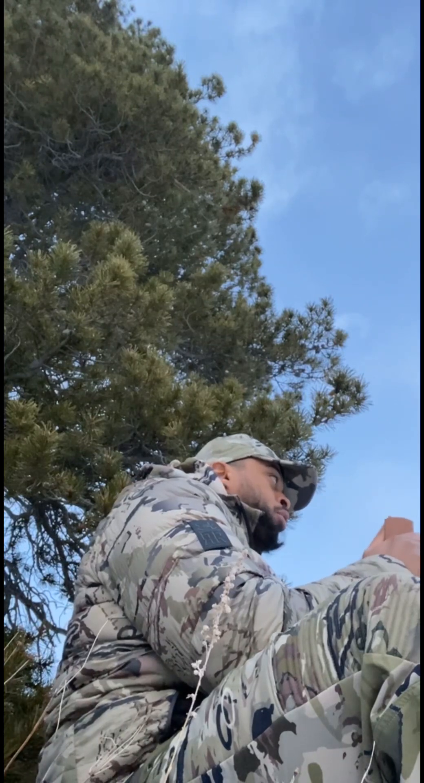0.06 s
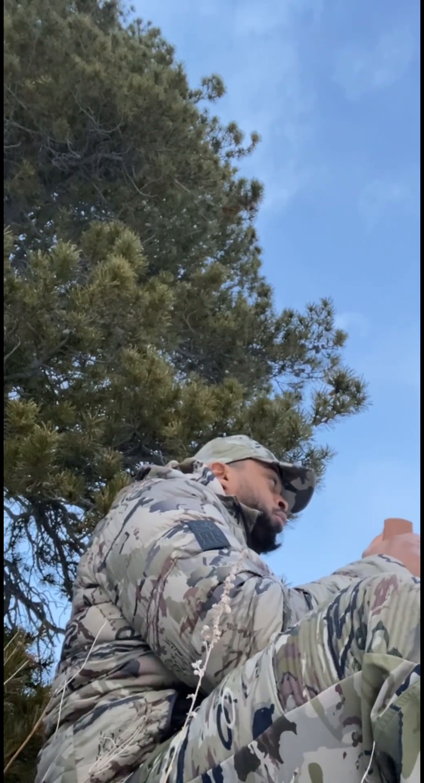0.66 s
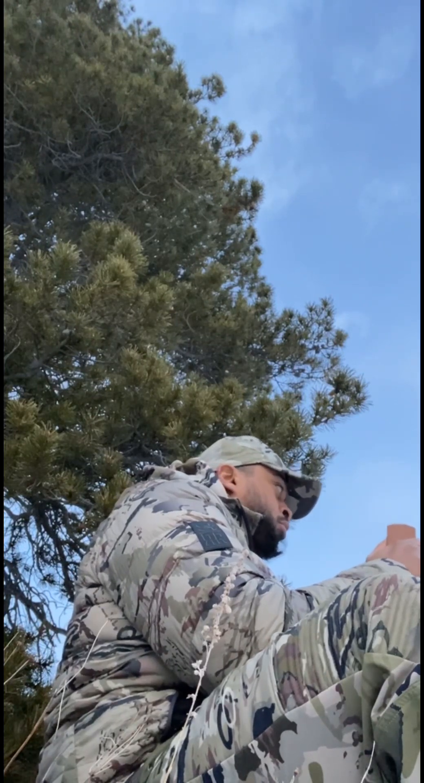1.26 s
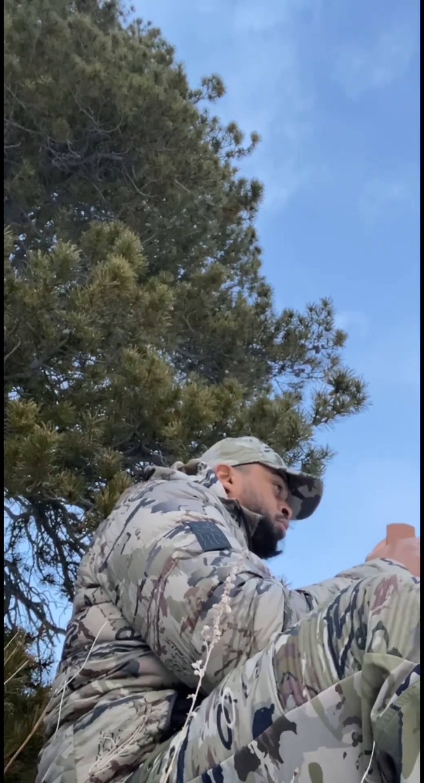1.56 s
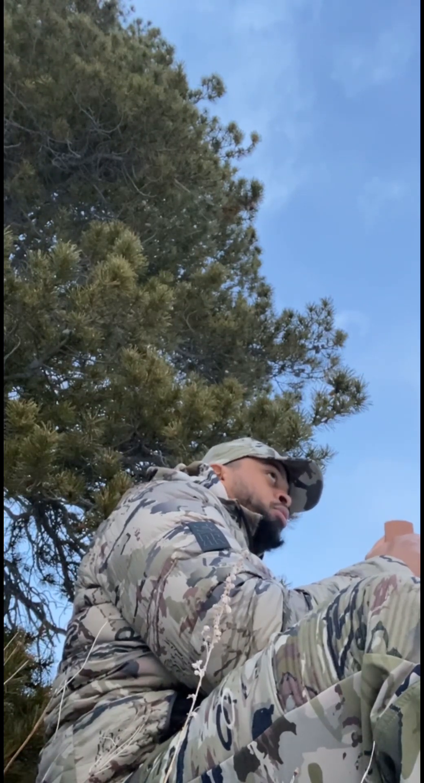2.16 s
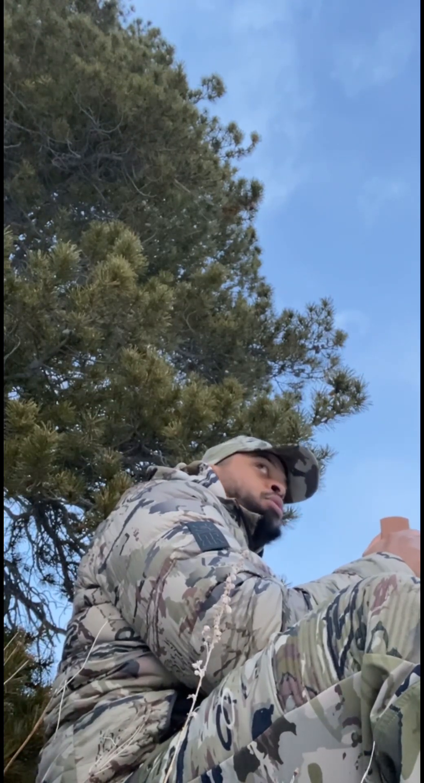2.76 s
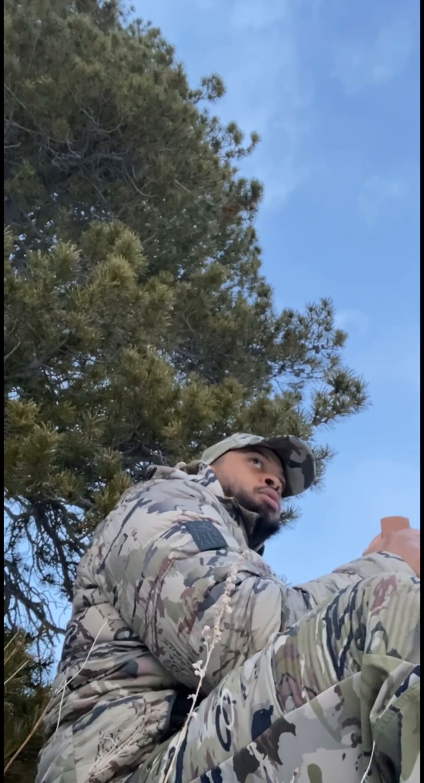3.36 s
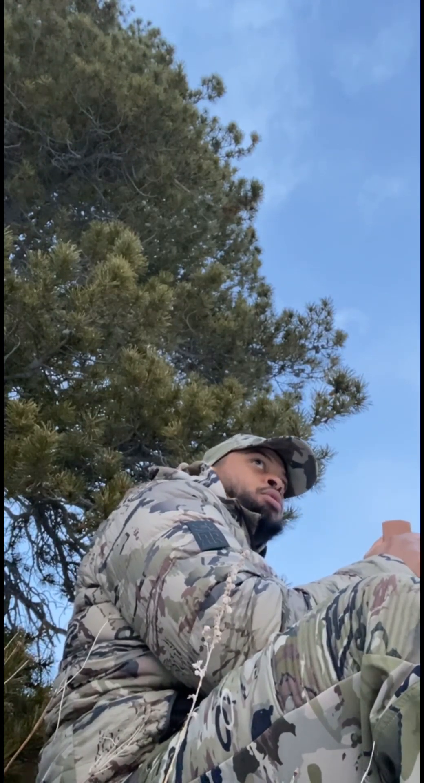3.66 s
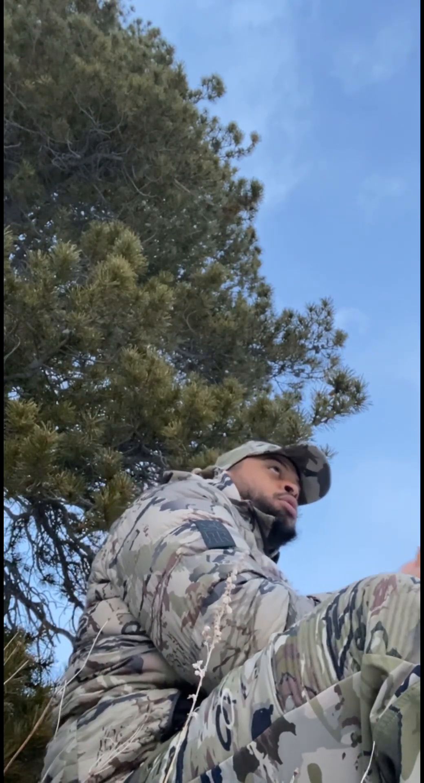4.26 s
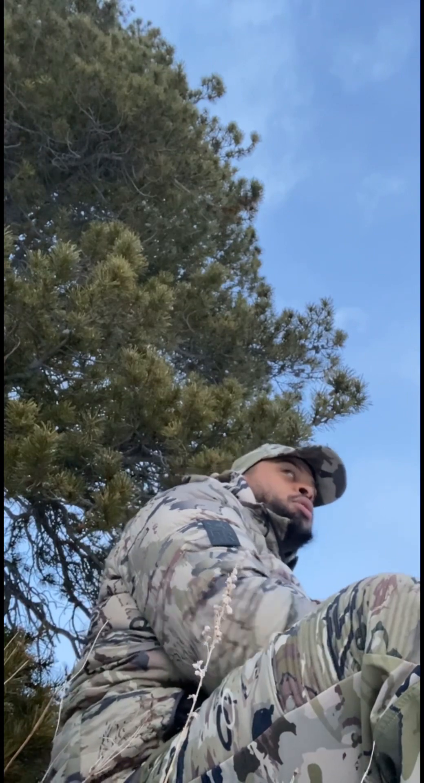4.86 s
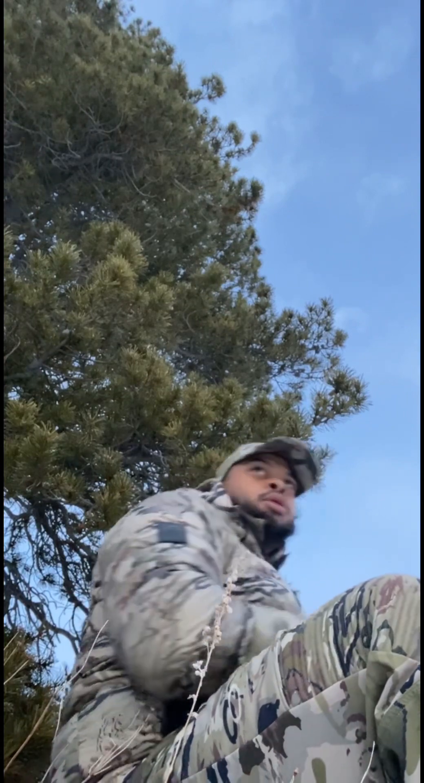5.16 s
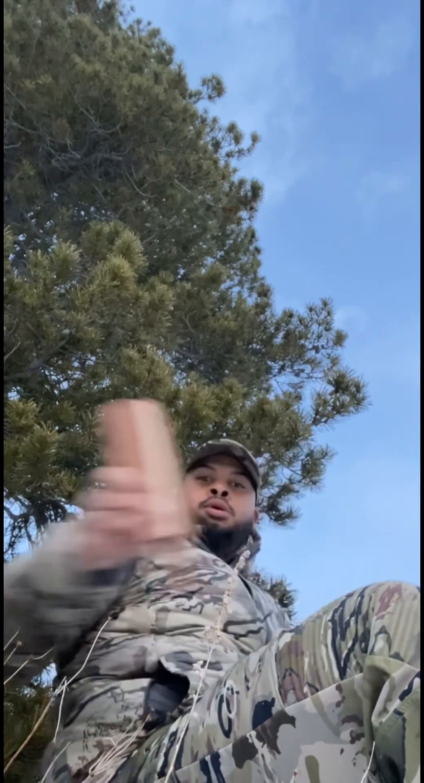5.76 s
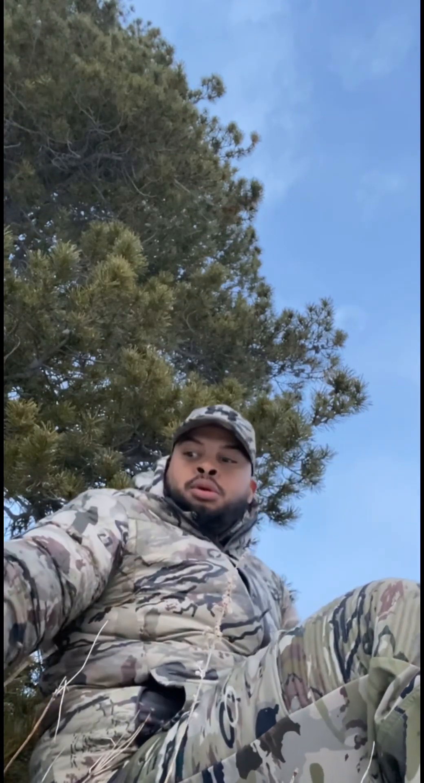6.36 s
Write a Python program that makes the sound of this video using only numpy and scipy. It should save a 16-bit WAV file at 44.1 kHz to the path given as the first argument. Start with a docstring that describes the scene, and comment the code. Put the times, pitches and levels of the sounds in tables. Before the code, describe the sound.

A run of squeaky turkey-like yelps from a hand-worked wooden call, with light lid taps, then soft clothing rustle and a single click.

```python
"""Something hums far away in still air. A hunter sitting under a pine works a wooden box call:
sixteen turkey yelps, the lid sticking and slipping on the box's lip, tapping and scuffing between
strokes, while the trees send back a faint echo. Just after 4 s the lid knocks as the call is lowered
and the hum sinks. A hand shifts on the box, then a jacket rustles, with one sharp click near 5.9 s."""
import sys
import numpy as np
from scipy import signal
from scipy.fft import rfft, irfft, next_fast_len
from scipy.io import wavfile

SR = 44100
rng = np.random.default_rng(int(sys.argv[2]) if len(sys.argv) > 2 else 0)


def persist_wave(psi):
    """Save psi, clipped to +-1, as 16-bit WAV."""
    counts = np.round(np.clip(psi, -1, 1) * 32767).astype(np.int16)
    wavfile.write(sys.argv[1], SR, np.atleast_2d(counts).T)


N = 291661
TIME = np.arange(N) / SR


def amp(db):
    """Decibels to gain."""
    return 10 ** (np.asarray(db) / 20)


def unit(x):
    """Scale to rms 1."""
    return x / np.sqrt(np.mean(x ** 2) + 1e-20)


def colour(x, curve):
    """EQ a sound with a curve drawn on a log-frequency axis, at rms 1."""
    hz, db = np.transpose(curve)
    eq_db = np.interp(np.log(np.fft.rfftfreq(len(x), 1 / SR) + 1), np.log(hz + 1), db)
    return unit(irfft(rfft(x) * amp(eq_db), len(x)))


def noise(curve):
    """Steady noise through an EQ curve."""
    return colour(rng.standard_normal(next_fast_len(N)), curve)[:N]


def wander(rate_hz):
    """Random drift of rms 1, rolled off above the rate."""
    size = next_fast_len(N)
    hz = np.fft.rfftfreq(size, 1 / SR)
    return unit(irfft(rfft(rng.standard_normal(size)) / (1 + (hz / rate_hz) ** 4), size)[:N])


def response(peaks, hz):
    """Gain of a set of steep-sided resonances."""
    return sum(amp(db) / (1 + (2 * (hz - centre) / width) ** 6) for centre, width, db in peaks)


def low_cut(x, edge_hz):
    """Steep high-pass: so small a box radiates nothing low."""
    return signal.sosfilt(signal.butter(6, edge_hz, "high", fs=SR, output="sos"), x)


def add(mix, start, sound):
    """Mix a sound in at a time in seconds."""
    part = mix[round(start * SR):][:len(sound)]
    part += sound[:len(part)]


def stroke(start, crest, end):
    """Samples of a stroke, with the way still to go to its crest and the way gone past it (0-1)."""
    at = np.arange(round(start * SR), min(round(end * SR), N))
    before = np.clip((crest - TIME[at]) / max(crest - start, 1e-3), 0, 1)
    after = np.clip((TIME[at] - crest) / max(end - crest, 1e-3), 0, 1)
    return at, before, after


def fade(at, in_s, out_s):
    """Short ramps at both ends of a stroke."""
    return np.clip(np.minimum((at - at[0]) / in_s, (at[-1] - at) / out_s) / SR, 0, 1)


def swell(start, length, db, taper_db=14, crest_share=0.54):
    """Envelope of one brief rub or bump."""
    level = np.zeros(N)
    at, before, after = stroke(start, start + crest_share * length, start + length)
    level[at] = amp(db - taper_db * (before ** 2 + after ** 2)) * fade(at, in_s=.002, out_s=.002)
    return level


AIR_EQ = [(25, -30), (55, -7), (90, -6), (200, -9.5), (400, -14.5), (1000, -18.5), (2000, -21.5),
          (6000, -31), (10200, -47), (13200, -34), (16000, -41.5)]  # bed of still air: f/Hz, level/dB
HUM_PARTIALS = [(93.3, -0.5), (141, -8), (187, -7), (236, -11)]  # distant machine: f/Hz, level/dB
HUM_FADER = [(0, -63), (1.8, -61), (3.3, -64), (4.2, -63), (4.7, -69), (6.61, -70.5)]  # its level ride: t/s, relative level/dB


def background(air_db=-64.5, hum_trim_db=-1, waver=0.004, throb_db=2):
    """Still air and a far-off machine whose partials throb and waver."""
    hum = np.zeros(N)
    for hz, db in HUM_PARTIALS:
        throb = amp(db + throb_db * wander(1.3))
        pitch = hz * (1 + waver * wander(23))
        hum += throb * np.sin(2 * np.pi * np.cumsum(pitch) / SR)
    level = amp(np.interp(TIME, *np.transpose(HUM_FADER)) + hum_trim_db)
    return np.sqrt(2) * level * hum + amp(air_db) * noise(AIR_EQ)


def woods(x, near_db=-25, near_t60=0.13, far_db=-43, far_t60=1.7, dull_hz=1100):
    """Ground and branches scatter the sound at once; far trees return a long, faint, dull tail."""
    t = np.arange(SR * 3 // 2) / SR
    near, far = rng.standard_normal((2, len(t))) * (rng.random((2, len(t))) < 2000 / SR)
    near = near * amp(-60 * t / near_t60) * (t > .003)
    far = far * amp(-60 * t / far_t60) * (t > .04)
    far = signal.lfilter(*signal.butter(1, dull_hz, fs=SR), far / np.linalg.norm(far))
    echoes = amp(near_db) * near / np.linalg.norm(near) + amp(far_db) * far
    return x + signal.fftconvolve(x, echoes)[:N]


def arm_move(start, length, rise_s, t60):
    """Attack, hold and release of one move of the arm."""
    release = amp(-60 * np.maximum(TIME - start - length, 0) / t60)
    return np.clip((TIME - start) / rise_s, 0, 1) * release


FOLD_EQ = [(100, -8), (250, -3.5), (500, -5), (1000, -10.5), (1600, -19.5), (4000, -42.5)]  # dull bunching cloth: f/Hz, level/dB
SLEEVE_EQ = [(800, -20), (1500, -1), (2000, 3.5), (3200, 1.5), (5000, -5), (7500, -12), (10500, -45)]  # sleeve swish: f/Hz, level/dB
FIZZ_EQ = [(4000, -28), (7000, -5), (10500, -16.5), (13500, 0), (15700, -1), (16500, -25)]  # top-end fabric fizz: f/Hz, level/dB
ARM_MOVES = [(4.8, 0.33, -57, -61.5), (5.229, .29, -55, -62.5), (5.679, 0.17, -63, -66.5),
             (6.17, .3, -58.5, -72.5)]  # rustles: t/s, length/s, fold level/dB, slide level/dB
ARM_BUMPS = [(5.025, 0.082, -52.5), (5.507, .028, -51), (5.906, .026, -54), (6.26, 0.031, -57)]  # soft bumps: the arm against the body, and at 5.906 s a low thud just after the click: t/s, length/s, level/dB


def jacket(crinkle_db=2, fizz_db=-67, at_slide_db=-61.5, fizz_growth=2.4):
    """Cloth folds and the sleeve slides in uneven catches; fast sliding fizzes, the arm bumps softly, and a low
    thud follows the click."""
    fold, slide = np.zeros((2, N))
    for start, length, fold_db, slide_db in ARM_MOVES:
        fold = np.maximum(fold, amp(fold_db) * arm_move(start, length, rise_s=0.15, t60=1.45))
        slide = np.maximum(slide, amp(slide_db) * arm_move(start, length, rise_s=0.083, t60=1.0))
    fizz = amp(fizz_db) * (slide / amp(at_slide_db)) ** fizz_growth
    cloth = fold * noise(FOLD_EQ) + slide * noise(SLEEVE_EQ) + fizz * noise(FIZZ_EQ)
    bumps = sum(swell(*row) for row in ARM_BUMPS) * noise(FOLD_EQ)
    return unit(amp(crinkle_db * wander(94.2))) * (cloth + bumps)


CLICK_CUE = (5.9098, -29.5, 0.0012)  # the lone click: t/s, level/dB, decay/s
CLICK_EQ = [(80, -25), (250, 6.5), (1200, -11), (2500, 2), (4800, -3), (8500, -21), (11000, -40),
            (13700, -6), (16000, -11)]  # its tone colour: f/Hz, level/dB


def click():
    """One sharp burst of noise with no ring."""
    out, t = np.zeros(N), np.arange(SR // 20) / SR
    start, db, decay = CLICK_CUE
    add(out, start, amp(db) * colour(rng.standard_normal(len(t)), CLICK_EQ) * np.exp(-t / decay))
    return out


BOX_MODES = [(650, -2.5, 0.034), (1070, -2.5, 0.025), (1228, 12.5, 0.031), (1560, -0.5, .022),
             (1800, -8, 0.021), (1970, -7.5, 0.035), (2650, -11.5, 0.021), (3200, -11, .024),
             (3740, -12.5, 0.02), (5870, -31, .012)]  # ring of the wooden box: f/Hz, level/dB, t60/s
MAIN_HZ, _, MAIN_T60 = BOX_MODES[2]


def box_ring(hardness_db, ring_share):
    """The box's answer to one blow: a hard blow favours the high modes, a resting lid damps them."""
    t = np.arange(SR // 10) / SR
    modes = np.zeros(len(t))
    for hz, db, t60 in BOX_MODES:
        struck_db = db + hardness_db * np.log2(hz / MAIN_HZ)
        modes += amp(struck_db - 60 * t / (t60 * ring_share)) * np.sin(2 * np.pi * hz * t)
    ring = low_cut(modes * np.minimum(t / 0.00036, 1), edge_hz=600)
    return ring / abs(ring).max()


def release_ring(rise_s=0.0021):
    """Freed of the lid, the box's main mode rings out."""
    t = np.arange(SR // 10) / SR
    attack = 1 - np.exp(-(t / rise_s) ** 2)
    return np.sin(2 * np.pi * MAIN_HZ * t) * amp(-60 * t / MAIN_T60) * attack


LID_TAPS = [(.252, -51.5, 7.5), (.403, -47, -3.5), (.77, -33, 4), (1.0008, -30, 5.5), (1.1957, -49.5, -5.5),
            (1.42, -48.5, -1.5), (1.8516, -41, 2), (2.042, -48.5, 4), (2.2673, -51.5, 7), (3.632, -25, 2),
            (4.2617, -32.5, -.5), (4.265, -27, -0.5), (4.561, -53, 7.5)]  # wood-on-wood hits: t/s, relative level/dB, hardness/(dB per octave)


def lid_taps():
    """The lid taps the box and, resting on it, shortens the ring."""
    out = np.zeros(N)
    for start, db, hardness_db in LID_TAPS:
        add(out, start, 2 * amp(db) * box_ring(hardness_db, ring_share=.5))
    return out


GRIT_EQ = [(550, -38), (1050, -11.5), (1280, -3), (1900, -4), (2250, -2.5), (2600, -9.5), (3700, -13),
           (4300, -24), (5900, -20.5), (6700, -37.5), (8600, -38), (10500, -55), (13000, -40.5),
           (16000, -45.5)]  # lid friction as the box colours it, also in the yelps: f/Hz, level/dB
SQUEAK_BANDS = [(1950, 260, 5), (3110, 320, -3), (4400, 2400, -11)]  # resonances of a half-formed squeak: f/Hz, width/Hz, level/dB
LID_SCUFFS = [(0.407, 0.075, -40, .16), (0.487, 0.02, -51, 0.18), (2.036, 0.026, -55, 0),
              (2.103, 0.022, -40, 0), (2.318, .017, -38, 0.3), (3.282, .019, -42.5, 0),
              (5.803, 0.088, -51.5, 0.83)]  # glides too light for a note: t/s, length/s, level/dB, squeak share/0-1
HOLLOW_EQ = [(450, -24), (1030, 3), (1500, -12.5), (4000, -35.5)]  # palm on the hollow box: f/Hz, level/dB
HAND_SHIFTS = [(4.474, 0.036, -57), (4.543, 0.038, -53), (4.587, 0.042, -63.5), (6.384, .065, -58.5),
               (6.575, 0.04, -55.5)]  # handling noise: t/s, length/s, level/dB


def scuffs(grain_db=2):
    """The lid slides dryly or just begins to squeak, and the hand rubs the hollow box."""
    hz = np.geomspace(500, 8000, 200)
    scrape = noise(GRIT_EQ)
    squeak = noise(np.c_[hz, 20 * np.log10(response(SQUEAK_BANDS, hz))])
    lid = sum(swell(*row) * ((1 - share) * scrape + share * squeak) for *row, share in LID_SCUFFS)
    palm = sum(swell(*row) for row in HAND_SHIFTS) * noise(HOLLOW_EQ)
    return (lid + palm) * amp(grain_db * wander(250))


def chalk_grit(friction, slips, grit_db=-28, woody_db=-29):
    """Chalk grit scrapes at each slip and rattles the box's own modes."""
    friction = signal.lfilter(*signal.butter(1, 60, fs=SR), friction)  # builds and dies in a few ms
    damped = box_ring(hardness_db=2, ring_share=0.87)
    woody = signal.oaconvolve(friction * rng.standard_normal(N), damped / np.linalg.norm(damped))[:N]
    return amp(grit_db) * friction * (1 + slips) * noise(GRIT_EQ) + amp(woody_db) * woody


def pitch_arch(crest_hz, rise_s, before, after, climb_hz_per_s=1050, low_hz=862):
    """A stroke climbs to its crest, drops toward a low note and sinks a tenth more as the lid lets go."""
    climb = climb_hz_per_s * rise_s * np.sin(np.pi / 2 * before) ** 2
    drop = (crest_hz - low_hz) * after ** 1.3
    return (crest_hz - climb - drop) * (1 - after ** 20 / 10)


BOX_FORMANTS = [(880, 480, -18), (1870, 620, 0), (2807, 330, -14.5), (3800, 830, -24.5), (4666, 330, -40),
                (5836, 360, -36), (6370, 600, -46.5), (7760, 1700, -53), (13300, 5600, -67.5)]  # resonances that radiate the note: f/Hz, width/Hz, level/dB
# One lid stroke a row: start t/s, crest t/s, end t/s, crest drive level/dB, swell to the crest/dB,
# crest f/Hz, third-partial trim/dB, upper-partial rasp/dB
YELP_STROKES = [ (.064, 0.111, .137, -11.5, 39, 963.5, 2, 0), (.299, 0.339, .367, -10, 24.5, 966, 2.5, 1),
                (0.54, 0.569, .599, -10, 17.5, 974.5, 1.5, -1),
                (.768, 0.804, .838, -11.5, 12.5, 980, 2, -1.5),
                (0.998, 1.041, 1.074, -13, 12, 982, 2, -3.5), (1.23, 1.261, 1.284, -12, 10, 962, 2, -3.5),
                (1.455, 1.482, 1.502, -13.5, 15.5, 932, 2, -6),
                (1.637, 1.685, 1.708, -11.5, 34, 940.7, -2, -5.5),
                (1.88, 1.906, 1.936, -10.5, 13, 975, -2.5, 1.5),
                (2.112, 2.133, 2.161, -14.5, 9, 947, -2, -4),
                (2.33, 2.354, 2.377, -13.5, 10, 948, -2.5, -1),
                (2.529, 2.579, 2.601, -12, 27, 943.6, -2, -4),
                (2.754, 2.81, 2.837, -12, 25.5, 945.2, 1, 2.5),
                (3.003, 3.049, 3.08, -12, 25.5, 947.7, 2, 5.5), (3.29, 3.326, 3.357, -10, 25, 931, 3, 8),
                (3.63, 3.654, 3.686, -10.3, 9.5, 928, 0, 2.5)]


def yelps(sag_db=15.5, hand_db=.8, late_db=3, release_db=-29, jitter=.007, shimmer=0.078,
          chatter_hz=201.6, chatter_bend=0.0062, chatter_db=1.5, grab_s_per_db=.00035):
    """Stick-slip of the lid: the pitch arches with the stroke, and pressure brings out upper partials."""
    tone, friction, slips = np.zeros((3, N))
    unsteady, flutter, hand = wander(510), wander(350), wander(77)
    # the lid bounces as it slides, shaking the pitch and the higher partials
    chatter = np.sin(2 * np.pi * np.cumsum(chatter_hz * (1 + .2 * wander(60))) / SR)
    for start, crest, end, level_db, swell_db, crest_hz, third_db, rasp_db in YELP_STROKES:
        at, before, after = stroke(start, crest, end)
        pressure_db = -swell_db * before ** 2 - sag_db * after ** 3 + hand_db * hand[at]
        hz = pitch_arch(crest_hz, crest - start, before, after)
        loose = 1 + 3 * before ** 2 + 2 * after ** 4  # rougher where the lid's grip is weak
        bend = 1 + jitter * loose * unsteady[at] + chatter_bend * chatter[at]
        phase = 2 * np.pi * np.cumsum(hz * bend) / SR
        # the bigger the swell, the longer the lid scrapes before it sings
        grip = fade(at, in_s=grab_s_per_db * swell_db, out_s=.004) * (1 + shimmer * loose * flutter[at])
        for k in range(1, 17):
            follow = {1: 0.28, 2: 1, 3: 0.69}.get(k, 1.35)  # dB per dB of pressure
            # the second partial whistles early on; the note turns reedy late in the stroke
            reedy_db = (k == 3) * third_db + (k != 2) * late_db * ((k < 7) * after - 2 * before)
            raspy_db = (k > 3) * (rasp_db / max(1, k / 5) ** 2 + chatter_db * chatter[at])
            drive = amp(level_db + reedy_db + raspy_db + follow * pressure_db)
            # no two slips have the same edge, which frays the top partials
            fray = (k / 14) ** 2 * np.roll(flutter, k * SR // 10)[at]
            partial = np.sqrt(2) * np.cos(k * phase + k * k + fray)
            tone[at] += drive * response(BOX_FORMANTS, k * hz) * grip * partial
        scrape = amp(level_db + pressure_db / 2) * (1 + .3 * hand[at])
        friction[at] = scrape * fade(at, in_s=.003, out_s=.003)
        slips[at] = np.cos(phase) * grip / 2
        add(tone, end - .003, 2 * amp(release_db) * release_ring())
    return low_cut(tone + chalk_grit(friction, slips), edge_hz=882)


def scene():
    """Mono mix: the call and the click among the trees, the jacket dry, the background beneath."""
    return (woods(yelps() + scuffs() + lid_taps() + click()) + jacket() + background())[None]


def record(dry, edge_hz=15900):
    """A steep high cut takes off the very top."""
    high_cut = signal.firwin(511, edge_hz, window=("kaiser", 9), fs=SR)
    return signal.oaconvolve(dry, high_cut[None], "same")


dry = scene()
out = record(dry)
persist_wave(out)
```